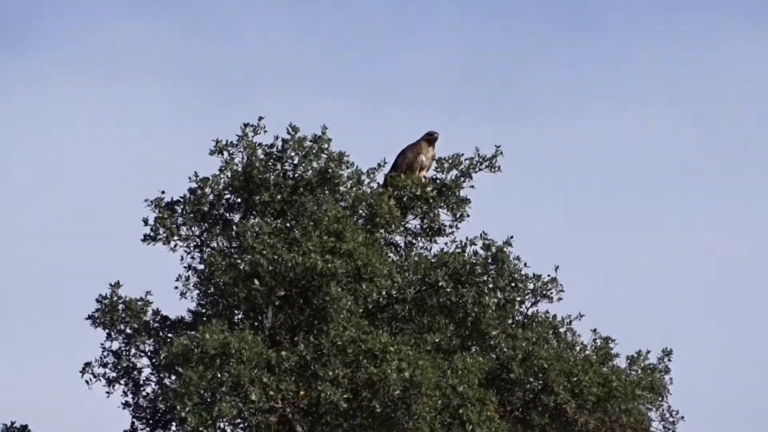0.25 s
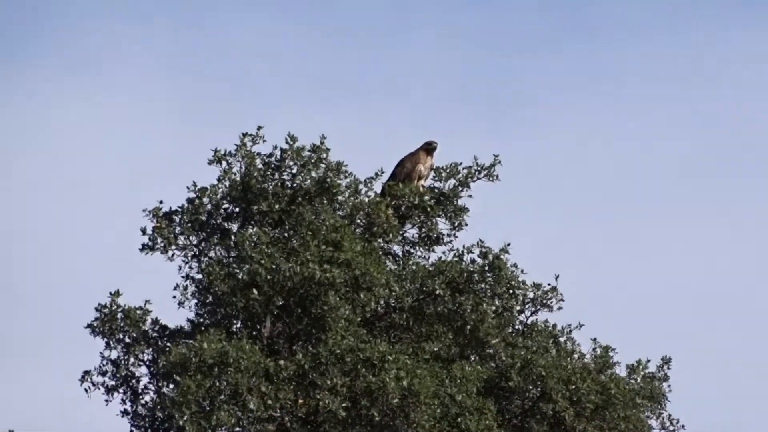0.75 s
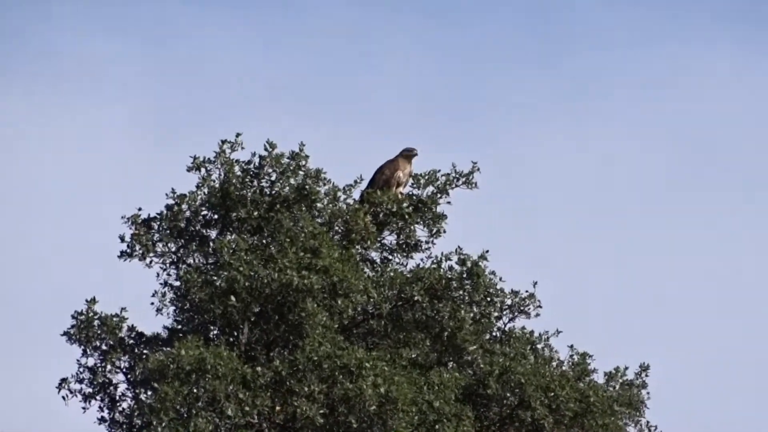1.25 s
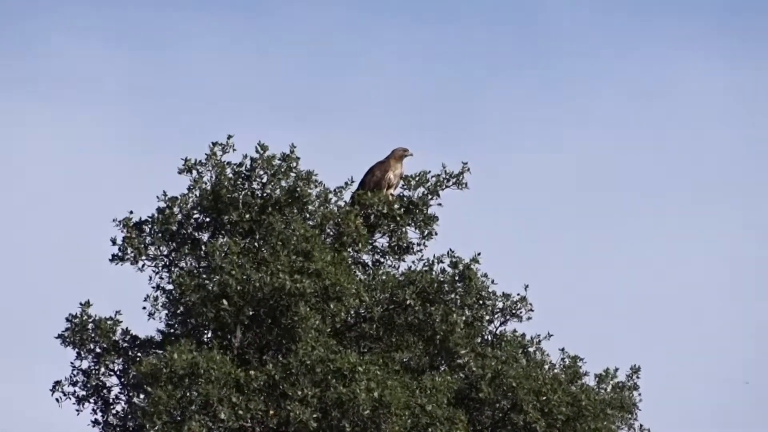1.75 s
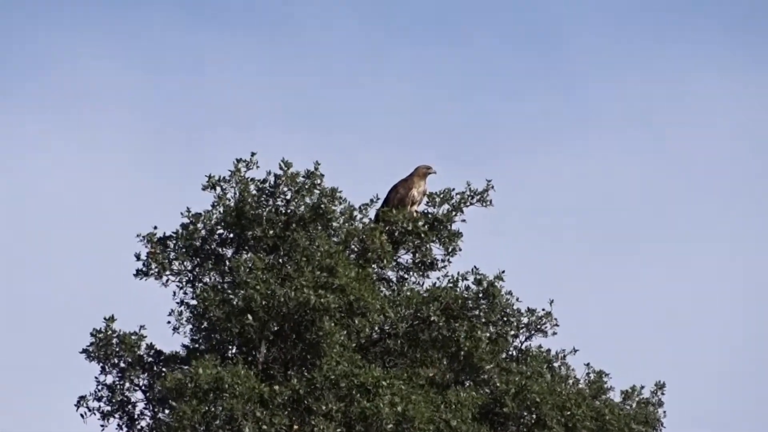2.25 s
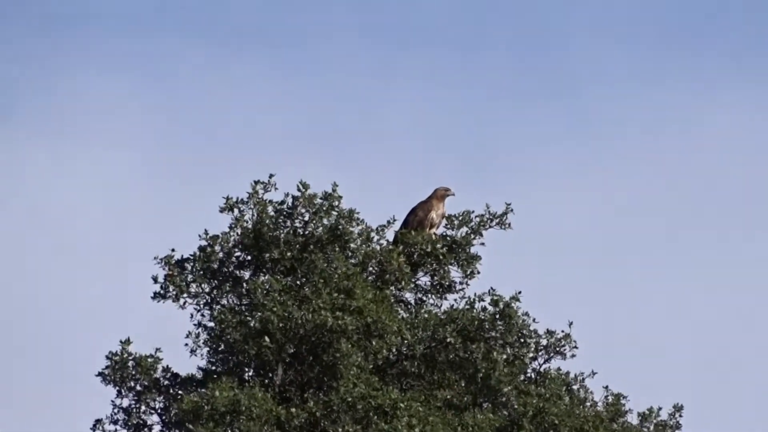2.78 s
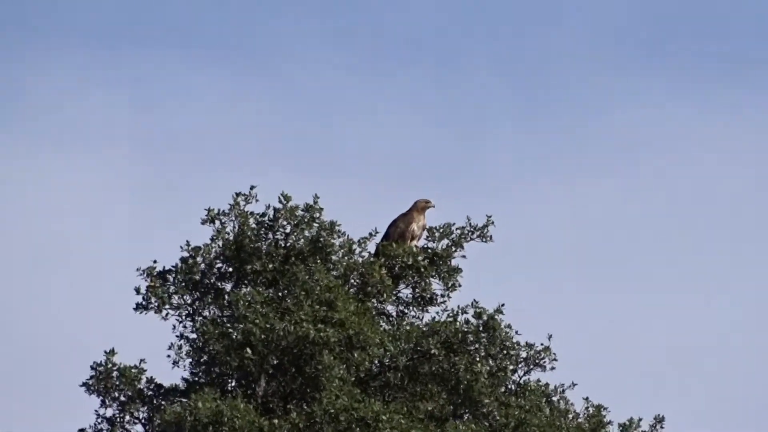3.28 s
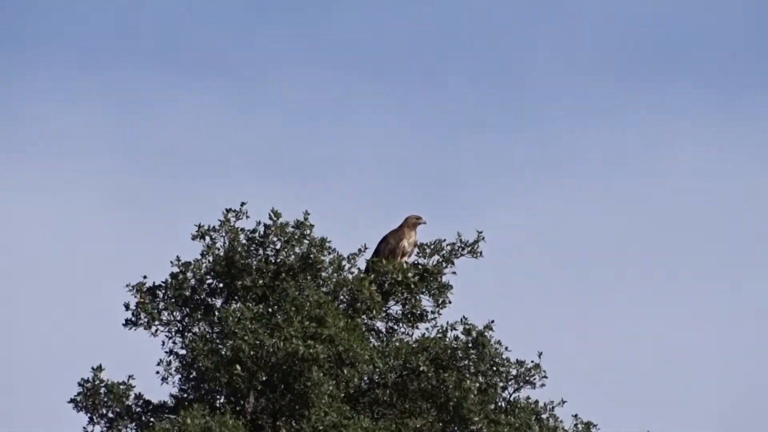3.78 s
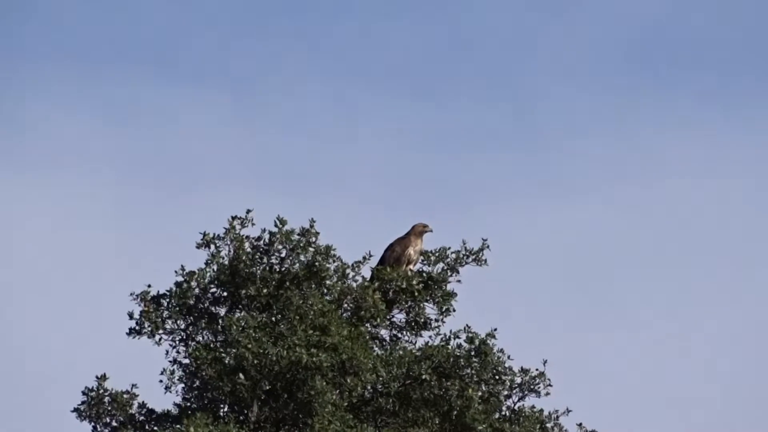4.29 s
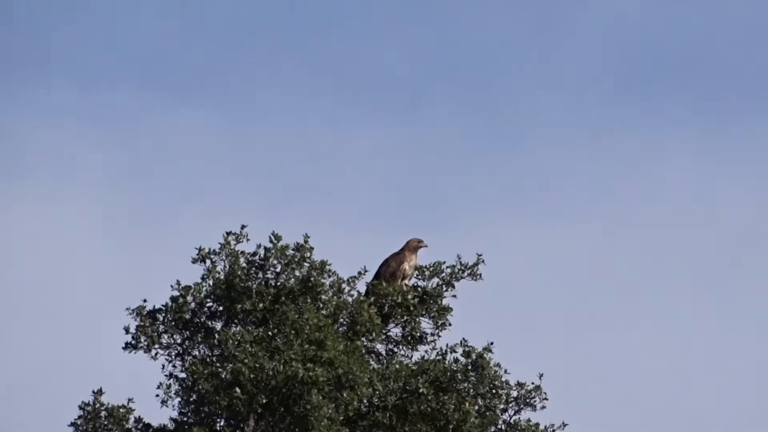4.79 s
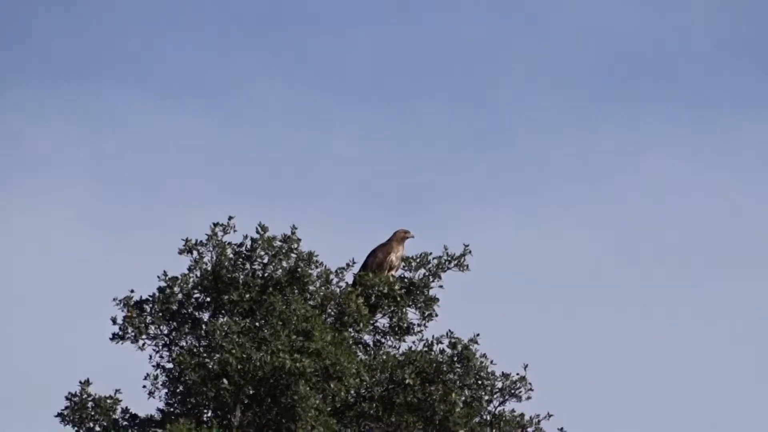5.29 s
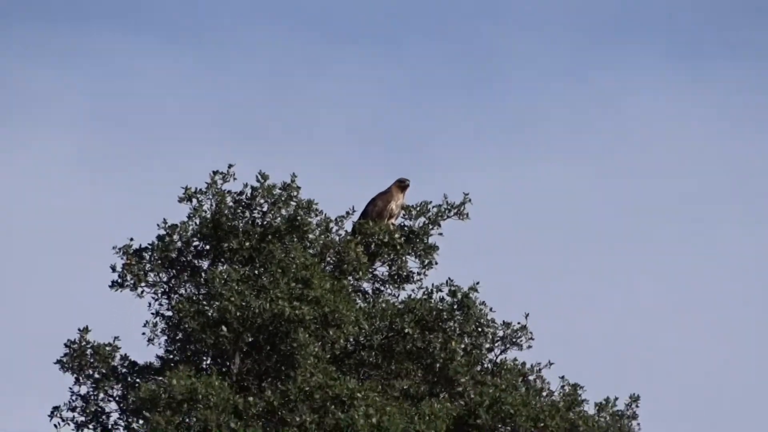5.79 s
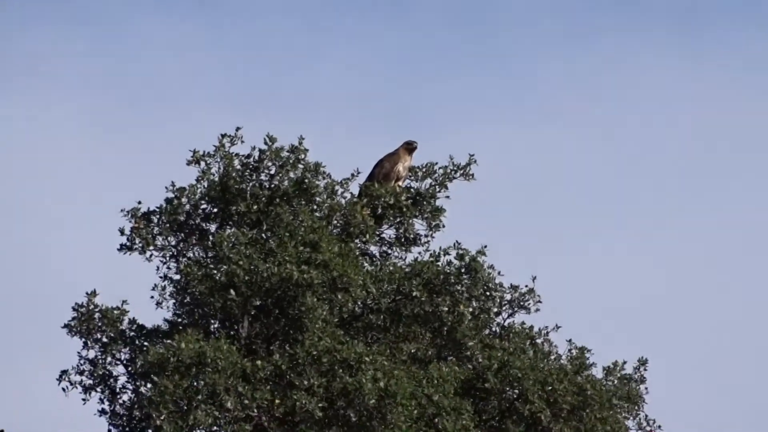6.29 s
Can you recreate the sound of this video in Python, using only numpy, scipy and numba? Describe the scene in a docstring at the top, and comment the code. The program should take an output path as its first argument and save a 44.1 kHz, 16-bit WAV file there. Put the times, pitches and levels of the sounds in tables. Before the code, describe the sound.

Low gusts rumble softly on the microphone in the open air, with faint paired bird chirps and some small, sharp ticks. Then a hawk in a treetop lets out a single long, raspy scream, by far the loudest sound. Its high, broken whistle falls steadily and fades away, leaving light wind, a few more ticks and faint birds.

```python
"""Among trees. Wind buffets the microphone and stirs leaves over a distant background wash.
Dry ticks and dull knocks sound nearby, a small bird chirps in pairs, far birds sing thin slurs.
At 3 s a red-tailed hawk in a treetop gives one long, hoarse scream: air hisses through its throat
and beak while a whistle from the syrinx catches, breaks off again and again, and slides down."""
import sys
import numpy as np
from scipy import signal
from scipy.fft import rfft, irfft
from scipy.io import wavfile
from scipy.ndimage import uniform_filter1d, minimum_filter1d, map_coordinates
from numba import njit

SR = 44100
rng = np.random.default_rng(int(sys.argv[2]) if len(sys.argv) > 2 else 0)


def output_pcm(signal):
    """Save a mono or channel-first signal as 16-bit PCM at the path in sys.argv[1].

    Samples are clipped to [-1, 1] before scaling.
    """
    pcm = np.clip(np.atleast_2d(signal).T, -1, 1) * 32767
    wavfile.write(sys.argv[1], SR, np.round(pcm).astype(np.int16))


N = 288546
TIME_S = np.arange(N) / SR


def undb(db):
    """Decibels to gain."""
    return 10 ** (np.asarray(db) / 20)


def unit(x):
    """Scale to rms 1."""
    return x / np.sqrt(np.mean(x ** 2))


def curves(table):
    """Columns after t/s, interpolated to every sample."""
    times_s, *columns = np.transpose(table)
    return [np.interp(TIME_S, times_s, column) for column in columns]


def colour(x, spectrum):
    """Filter by (f/Hz, gain/dB) points."""
    hz, db = np.transpose(spectrum)
    bins_hz = np.arange(N // 2 + 1) * SR / N + 1
    return irfft(rfft(x) * undb(np.interp(np.log(bins_hz), np.log(hz), db)), N)


def noise(spectrum):
    """Coloured noise, rms 1."""
    return unit(colour(rng.standard_normal(N), spectrum))


def wobble(rate_hz, size=N):
    """Smooth random control, spread about 1."""
    position = np.arange(size) * rate_hz / SR
    knots = rng.standard_normal(int(position[-1]) + 4)
    return map_coordinates(knots, [position + 1], order=2, mode="nearest")


def add(track, start_s, sound):
    """Mix a sound into a track."""
    i = int(start_s * SR)
    track[i:i + len(sound)] += sound[:max(N - i, 0)]


def stereo(mid, side):
    """Mid/side to left/right."""
    return np.array([mid + side, mid - side])


@njit
def resonance(x, hz, width_hz):
    """State-variable band-pass with a moving centre."""
    y, band_state, low_state = np.empty(len(x)), 0., 0.
    for i in range(len(x)):
        g, damping = np.tan(np.pi * hz[i] / SR), width_hz / hz[i]
        band = (band_state + g * (x[i] - low_state)) / (1 + g * (g + damping))
        band_state = 2 * band - band_state
        low_state += 2 * g * band
        y[i] = damping * band
    return y


def ring(hz, width_hz):
    """Noise through two band-passes, each width_hz wide; rms 1."""
    once = resonance(rng.standard_normal(N), hz, float(width_hz))
    return unit(resonance(once, hz, float(width_hz)))


# Wind strength: t/s, relative level/dB
GUSTS = [(0, -38), (.3, -42), (1.07, -39.5), (1.16, -53), (1.42, -37.5), (1.58, -47), (1.69, -35),
         (1.8, -48), (2.04, -39), (2.3, -44.5), (2.55, -38.5), (2.7, -47.5), (3.3, -60.5), (3.46, -50.5),
         (4.25, -57), (4.42, -44), (4.75, -50.5), (6.54, -47.5)]
# Eddies: t/s, length/s, relative level/dB
PUFFS = [(0.099, 0.073, -32.5), (0.352, 0.17, -37), (0.614, 0.13, -39), (0.814, 0.14, -35),
         (1.044, 0.035, -35.5), (1.616, 0.2, -40.5), (1.996, 0.052, -35), (2.383, 0.056, -30.5),
         (2.44, 0.049, -37), (6.192, 0.055, -44), (6.27, 0.056, -39)]
# Spectra of in-phase wind, antiphase wind and eddies: f/Hz, level/dB
WIND_COMMON = [(15, -6.5), (35, -2.5), (80, -0.5), (120, -4.5), (180, -11.5), (280, -22), (500, -38),
               (1200, -57.5), (8000, -90.5)]
WIND_OPPOSED = [(20, -7.5), (60, -1), (120, 0.5), (200, -8), (330, -16.5), (600, -25), (1200, -37.5),
                (8000, -84.5)]
EDDY = [(30, -41), (120, 7.5), (250, 4), (450, -10), (900, -22), (2000, -45), (8000, -72)]


def wind(buffet_db=3.0, common_db=1.07, opposed_db=-5.0, eddy_common_db=-5):
    """Gusts buffet the two microphone ports; sharp eddies push them mostly in opposite ways."""
    gust_db, = curves(GUSTS)
    buffet = undb(gust_db + buffet_db * wobble(30))
    puffs = np.zeros(N)
    for start_s, length_s, db in PUFFS:
        add(puffs, start_s, undb(db) * np.hanning(int(length_s * SR)))
    mid = undb(common_db) * buffet * noise(WIND_COMMON) + undb(eddy_common_db) * puffs * noise(EDDY)
    side = undb(opposed_db) * buffet * noise(WIND_OPPOSED) + puffs * noise(EDDY)
    return stereo(mid, side)


def rustle(gain_db=-70, follow=0.77, flicker_db=2):
    """Leaves stir faintly with the gusts."""
    gust_db, = curves(GUSTS)
    spectrum = [(800, -22.0), (1800, 2.5), (2600, -0.5), (3800, 1.5), (5500, -10.5), (10000, -14.5)]
    level = undb(gain_db + follow * (gust_db - gust_db.max()) + flicker_db * wobble(32))
    return level * stereo(noise(spectrum), .5 * noise(spectrum))


# Level of the distant background wash, which ducks during the scream: t/s, relative level/dB
WASH_LEVEL = [(0, -55.5), (1.2, -57), (2.2, -56.5), (3.0, -55), (3.2, -60.5), (3.9, -60), (4.45, -56.5),
              (5.5, -57.5), (6.06, -53.5), (6.54, -55.5)]
# Its spectrum, with faint open-air hiss on top: f/Hz, level/dB
WASH_SPECTRUM = [(100, -5.5), (300, -2), (450, 1.5), (650, -2.5), (800, -3), (1200, -8), (1550, -18.5),
                 (2150, -22), (2600, -20), (3200, -30), (3900, -28), (5000, -36.5), (8000, -32.5),
                 (10500, -27.5)]


def wash(gain_db=1, side_db=-6, drone_hz=655., drone_start_db=-59.5, follow=2.4, fade_db_s=-0.76):
    """Distant background noise; a slowly fading drone stands out when the wash is louder."""
    wash_db, = curves(WASH_LEVEL)
    drone_db = drone_start_db + fade_db_s * TIME_S + follow * (wash_db - wash_db[0])
    drone = undb(drone_db) * ring(np.full(N, drone_hz), width_hz=45)
    level = undb(wash_db + gain_db + 0.37 * wobble(5.4))
    return level * stereo(noise(WASH_SPECTRUM), undb(side_db) * noise(WASH_SPECTRUM)) + drone


# Dry ticks: t/s, level/dB, f/Hz
TICKS = [(0.1046, -29, 10400), (.769, -53, 8500), (1.288, -18, 10500), (1.3896, -45, 8300),
         (1.416, -45, 7000), (1.445, -41, 9900), (1.476, -49, 5000), (1.5843, -52, 8340),
         (1.638, -42, 8250), (2.918, -45, 3320), (2.9729, -44, 7100), (5.0904, -41, 8200),
         (5.212, -38.5, 8730), (5.2355, -32.5, 8100), (5.806, -38.5, 9490), (6.2942, -45.5, 9000),
         (6.4418, -42.5, 8800)]


def ticks(snap_s=0.0004, tail_db=-16, tail_s=0.0037, body_db=-27, body_hz=4300):
    """Snaps of a few cycles, each with a duller body and a short scattered tail."""
    out, t = np.zeros(N), np.arange(SR // 50) / SR
    scatter = noise([(2000, -32), (3500, -9), (5500, -18), (7400, 22), (8500, -6), (10200, 11)])
    pulse = np.exp(-(2 * t / snap_s - 2) ** 2)
    body = undb(body_db) * np.sin(2 * np.pi * body_hz * t)
    for start_s, db, hz in TICKS:
        snap = pulse * (np.sin(2 * np.pi * hz * t) + body)
        tail = undb(tail_db) * np.exp(-t / tail_s) * scatter[int(start_s * SR):][:len(t)]
        add(out, start_s, undb(db) * (snap + tail))
    return out


def chirp(length_s, first_hz, last_hz, octave_db=-28, branch_db=-12, plunge_hz=1000, bend=1.6):
    """A tone swells and falls ever faster; midway the syrinx's other side splits off and plunges."""
    u = np.linspace(0, 1, int(length_s * SR))
    hz = first_hz + (last_hz - first_hz) * u ** bend + 40 * wobble(287, len(u))
    phase = 2 * np.pi * np.cumsum(hz) / SR
    tone = np.sin(phase) + undb(octave_db) * np.sin(2 * phase)
    arch = np.sin(np.pi * u)
    swell = arch ** 2 * undb(0.62 * wobble(153, len(u))) + 0.23 * arch
    split = np.clip((u - .55) / 0.42, 0, 1)
    branch = np.sin(np.pi * split) * np.sin(2 * np.pi * np.cumsum(hz - plunge_hz * split) / SR)
    return np.sqrt(2) * (swell * tone + undb(branch_db) * branch)


# Chirp pairs: t/s, main level/dB, main first f/Hz, main last f/Hz, lead last f/Hz
CHIRPS = [(.272, -55.5, 5870, 3700, 3400), (1.178, -52, 5580, 4260, 3960), (1.544, -54, 5760, 3550, 3160),
          (5.322, -55, 5210, 3900, 3250)]


def songbird(lead_s=0.074, lead_first_hz=5930, lead_db=-4, main_delay_s=0.1, main_s=0.084):
    """A small bird calls: a steep lead chirp, then a louder, shallower main one."""
    out = np.zeros(N)
    for start_s, db, first_hz, last_hz, lead_last_hz in CHIRPS:
        add(out, start_s, undb(db + lead_db) * chirp(lead_s, lead_first_hz, lead_last_hz))
        add(out, start_s + main_delay_s, undb(db) * chirp(main_s, first_hz, last_hz))
    return out


# Far bird calls: t/s, length/s, first f/Hz, last f/Hz, relative level/dB
SLURS = [(.515, 0.077, 4000, 2900, -68.5), (1.93, .09, 4220, 2880, -69), (2.195, 0.28, 4770, 3750, -75),
         (5.447, .32, 4980, 4040, -74.5), (5.97, .1, 5860, 4400, -75), (6.38, .16, 4670, 4470, -79)]


def far_birds(waver_hz=50, direct_db=-2):
    """Thin slurs fall and level off, half lost in scatter through the trees."""
    out = np.zeros(N)
    for start_s, length_s, first_hz, last_hz, db in SLURS:
        u = np.linspace(0, 1, int(length_s * SR))
        hz = last_hz + (first_hz - last_hz) * (1 - u) ** 1.4 + waver_hz * wobble(297, len(u))
        swell = np.sqrt(2) * undb(db) * np.sin(np.pi * u)
        add(out, start_s, swell * np.sin(2 * np.pi * np.cumsum(hz) / SR))
    return undb(direct_db) * out + foliage(out, echo_db=-3.5, decay_s=0.026)


# Soft knocks: t/s, relative level/dB, f/Hz, decay/s
KNOCKS = [(1.637, -42.5, 3540, 0.0017), (3.0425, -18.5, 890, 0.0025), (3.06, -32, 590, 0.0018),
          (3.1078, -26.5, 440, 0.0027)]


def knocks(attack_s=.001):
    """Dull bumps swell quickly and die within milliseconds."""
    out, t = np.zeros(N), np.arange(SR // 20) / SR
    for start_s, db, hz, decay_s in KNOCKS:
        envelope = (1 - np.exp(-t / attack_s)) * np.exp(-t / decay_s)
        add(out, start_s, undb(db) * envelope * np.sin(2 * np.pi * hz * t))
    return out


# Hiss spectra, beak wide open and nearly closed: f/Hz, level/dB
BEAK_OPEN = [(500, -45.5), (900, -29), (1400, -44), (2650, -37), (3800, -9), (4700, -3.5), (4920, -21),
             (5300, -8), (5950, -14.5), (6700, -5), (7400, 0.5), (8350, -11.5), (9100, -9), (9900, -1.5),
             (11000, -9.5)]
BEAK_NARROW = [(1100, -28.5), (1950, -34), (2550, -22.5), (3100, 9), (4000, 6.5), (4400, -9), (4680, -5.5),
               (4900, -17), (5300, -9), (5950, -6), (6450, -1), (7450, 3.5), (8150, -9), (9200, 4),
               (11000, -6.5)]


def beak_hiss(gain_db=2.41, narrow_db=2, close_at_s=3.98, close_tau_s=0.049, rest_opening=0.12):
    """Air hisses through the hawk's beak, which nearly closes mid-scream."""
    closing = (1 + np.tanh((TIME_S - close_at_s) / (2 * close_tau_s))) / 2
    closure = (1 - rest_opening) * closing
    wide = np.sqrt(1 - closure) * noise(BEAK_OPEN)
    narrow = np.sqrt(closure) * undb(narrow_db) * noise(BEAK_NARROW)
    return undb(gain_db) * (wide + narrow)


def rasp(voice_hz, sunk_oct, gain_db=0.5, growth_db_oct=3, wander_hz=110):
    """A noise band wavers around the voice's pitch and gains as it sinks."""
    band = ring(voice_hz + wander_hz * wobble(45), width_hz=440)
    return undb(gain_db + growth_db_oct * sunk_oct) * band


# Throat modes: f/Hz, width/Hz, relative level/dB, fall/(oct/oct), growth/(dB/oct)
THROAT = [(1900, 125, -38.5, 0.48, 30), (2430, 160, -44, .16, 56)]


def throat(sunk_oct, cap_db=-7.5):
    """Two throat resonances fall and grow with each octave the voice sinks."""
    out = np.zeros(N)
    for hz, width_hz, db, fall, growth_db_oct in THROAT:
        level = undb(np.minimum(db + growth_db_oct * sunk_oct, cap_db))
        out += level * ring(hz * 2 ** (-fall * sunk_oct), width_hz)
    return out


# Force of the scream: t/s, relative level/dB
BLAST = [(3.05, -27), (3.06, -22), (3.19, -17), (3.69, -18.5), (4.04, -29), (4.38, -28), (4.52, -31),
         (4.6, -28.5), (4.93, -39.5), (5.09, -54)]
# Centre of the rasp: t/s, f/Hz
VOICE = [(3.05, 4460), (3.3, 4380), (3.7, 3970), (4.1, 3520), (4.4, 3060), (4.62, 3000), (4.87, 2400),
         (5.09, 1850)]


def hawk(start_s=3.041, end_s=5.1, attack_s=0.0036, release_s=0.1, build_s=0.79,
         rasp_onset_db=-21, throat_onset_db=-5, grain_db=0.65, surge_db=0.56):
    """One blast of air, chopped by flapping membranes, drives hiss, rasp and throat; a whistle on top."""
    blast_db, = curves(BLAST)
    voice_hz, = curves(VOICE)
    sunk_oct = np.log2(voice_hz[0] / voice_hz)
    weakness = np.clip(1 - (TIME_S - start_s) / build_s, 0, 1)
    breath = beak_hiss()
    breath += undb(rasp_onset_db * weakness) * rasp(voice_hz, sunk_oct)
    breath += undb(throat_onset_db * weakness) * throat(sunk_oct)
    chop = undb(grain_db * wobble(380) + surge_db * wobble(60))
    gate = np.clip(np.minimum((TIME_S - start_s) / attack_s, (end_s - TIME_S) / release_s), 0, 1)
    return gate * chop * undb(blast_db) * breath + whistle()


def syrinx(hz, db, roughness, flutter_rate_hz=420, flutter_hz=170, waver_hz=70,
           shimmer_db=6, edge_s=0.0065, octave_db=-12):
    """The syrinx locks into a tone, shaken by roughness, and an octave that grows with force."""
    n = len(hz)
    t = np.arange(n) / SR
    jitter_hz = flutter_hz * wobble(flutter_rate_hz, n) + waver_hz * wobble(70, n)
    phase = 2 * np.pi * np.cumsum(hz + roughness * jitter_hz) / SR
    fade = np.sin(np.pi / 2 * np.minimum(np.minimum(t, t[-1] - t) / edge_s, 1))
    shimmer = unit(undb(shimmer_db * roughness * wobble(flutter_rate_hz, n)))
    force = np.sqrt(2) * undb(db) * fade * shimmer
    return force * np.sin(phase), force ** 2 * undb(octave_db) * np.sin(2 * phase)


# Squeaks: t/s, length/s, first f/Hz, last f/Hz, level/dB, roughness/0-1
SQUEAKS = [(3.073, 0.023, 4720, 4650, -29.5, 0.48), (3.128, 0.059, 4800, 4630, -25, 0.35),
           (3.2, .05, 4740, 4540, -22.5, .23), (3.251, .056, 4340, 4240, -21, .65),
           (3.302, 0.049, 4700, 4540, -15.5, .15), (3.356, 0.039, 4590, 4670, -13.5, .04),
           (3.395, .051, 4660, 4530, -17, .14), (3.477, 0.055, 4270, 4390, -19.5, 0.07),
           (3.518, 0.045, 4480, 4590, -25, .16), (3.578, 0.049, 4440, 4600, -18, 0.36),
           (3.609, 0.037, 3857, 3920, -17.5, 0.23), (4.776, .021, 2370, 2360, -15, 0),
           (4.794, 0.067, 2323, 2173, -30.5, 0.2), (4.962, 0.038, 1863, 1755, -33.5, .1),
           (4.99, .05, 2360, 1985, -39, 0.35), (5.034, .031, 1953, 1730, -33.5, 0.3)]
# Long whistle: t/s, f/Hz, relative level/dB
WHISTLE = [(3.7, 4204, -19.5), (3.77, 4087, -20), (3.792, 4049, -15), (3.862, 3757, -14),
           (3.964, 3604, -20.5), (3.974, 3557, -15), (4.056, 3444, -15), (4.078, 3310, -20),
           (4.11, 3320, -13), (4.178, 3238, -18), (4.184, 3200, -22), (4.208, 3270, -12.5),
           (4.262, 3280, -15), (4.29, 3180, -14), (4.342, 3193, -17), (4.488, 2955, -19.5),
           (4.51, 2980, -38), (4.576, 3065, -30), (4.596, 3032, -21.5), (4.716, 2670, -24),
           (4.722, 2650, -45.5), (4.77, 2590, -25.5)]
# Its hoarseness: t/s, roughness/0-1
HOARSE = [(3.86, 0.2), (3.89, .58), (3.95, .58), (3.98, 0.18), (4.1, .22), (4.2, 0.14), (4.31, 0.2),
          (4.33, 0.28)]


def whistle(held_gain_db=1.93):
    """One long falling whistle; before and after it the voice catches and breaks off in squeaks."""
    notes = []
    for start_s, length_s, first_hz, last_hz, db, roughness in SQUEAKS:
        glide_hz = np.linspace(first_hz, last_hz, int(length_s * SR))
        notes.append((start_s, syrinx(glide_hz, db, roughness)))
    hz, db = curves(WHISTLE)
    roughness, = curves(HOARSE)
    held = (TIME_S >= WHISTLE[0][0]) & (TIME_S < WHISTLE[-1][0])
    notes.append((WHISTLE[0][0], syrinx(hz[held], db[held] + held_gain_db, roughness[held])))
    tones, octaves = np.zeros(N), np.zeros(N)
    for start_s, (tone, octave) in notes:
        add(tones, start_s, tone)
        add(octaves, start_s, octave)
    return tones + colour(octaves, BEAK_NARROW)  # the beak filters the octave


def foliage(x, echo_db, decay_s):
    """Leaves and branches scatter a short echo, different on each side."""
    t = np.arange(SR // 2) / SR
    echoes = rng.standard_normal((2, len(t))) * np.exp(-t / decay_s)
    echoes /= np.sqrt(np.sum(echoes ** 2, axis=1, keepdims=True))
    return undb(echo_db) * signal.fftconvolve(x[None], echoes, axes=1)[:, :N]


# Side share of a frontal sound: f/Hz, level/dB
PORT_SIDE = [(500, -20), (2000, -21.5), (3300, -23), (4300, -15), (6400, -24), (11000, -13.5)]


def ports(x, scatter_samples=160):
    """Sound from ahead reaches both ports alike but for a few milliseconds of scatter."""
    scatter = unit(rng.standard_normal(scatter_samples)) / np.sqrt(scatter_samples)
    return stereo(x, colour(signal.fftconvolve(x, scatter)[:N], PORT_SIDE))


def scene():
    """Hawk, small bird, ticks and knocks ahead; far birds, wind, leaves and the wash all around."""
    scream, chirps = hawk(), songbird()
    echoes = foliage(scream, echo_db=-29, decay_s=0.093) + foliage(chirps, echo_db=-11, decay_s=0.039)
    ahead = ports(scream + chirps + ticks() + knocks())
    return ahead + echoes + far_birds() + wind() + rustle() + wash()


def record(dry, ceiling=0.52, window_samples=220, cutoff_hz=11030):
    """A limiter eases down the highest peaks; a steep low-pass cuts the top."""
    gain = np.minimum(1, ceiling / (np.abs(dry).max(axis=0) + 1e-9))
    smooth_gain = uniform_filter1d(minimum_filter1d(gain, window_samples), window_samples)
    lowpass = signal.ellip(12, .2, 70, cutoff_hz, fs=SR, output="sos")
    return signal.sosfilt(lowpass, dry * smooth_gain)


dry = scene()
out = record(dry)
output_pcm(out)
```